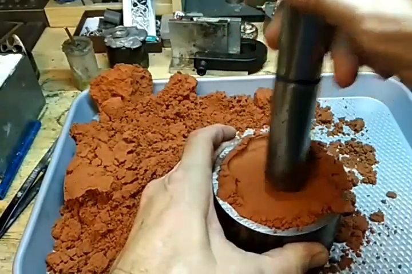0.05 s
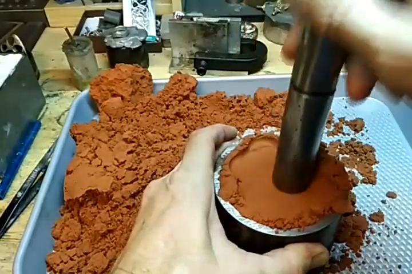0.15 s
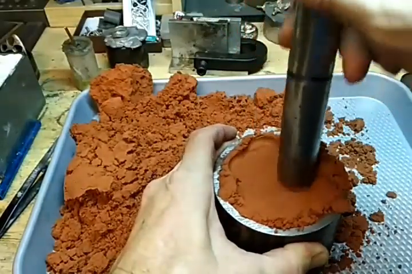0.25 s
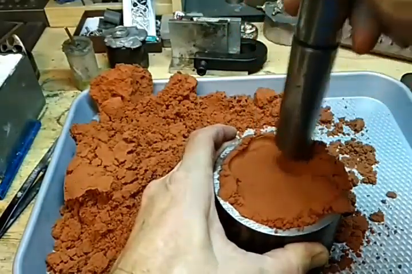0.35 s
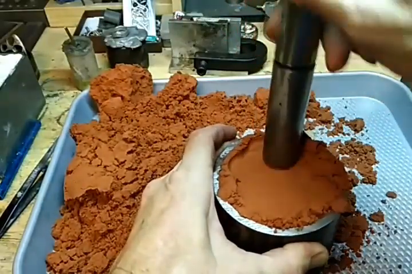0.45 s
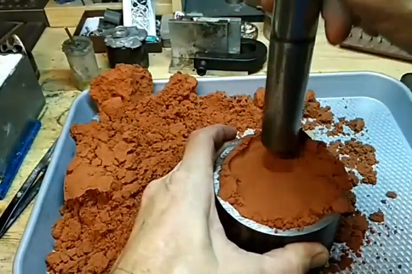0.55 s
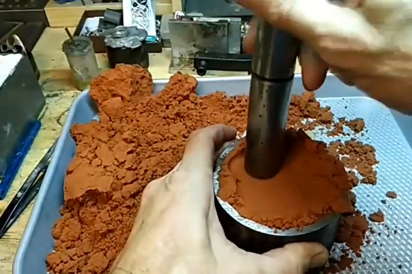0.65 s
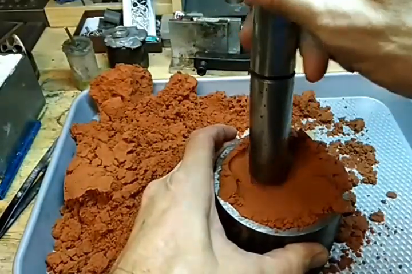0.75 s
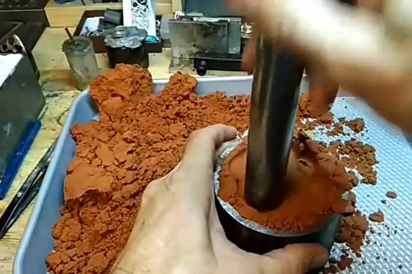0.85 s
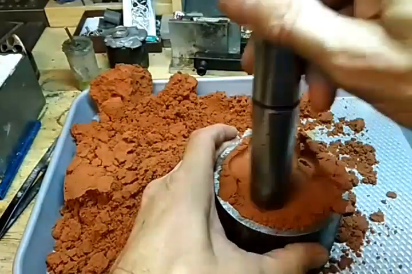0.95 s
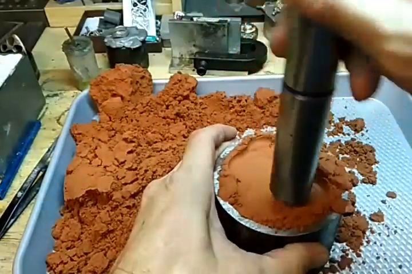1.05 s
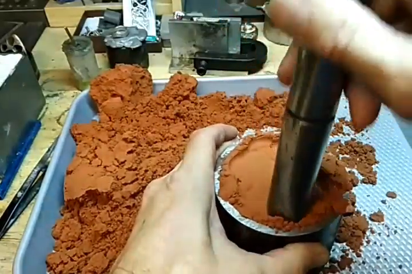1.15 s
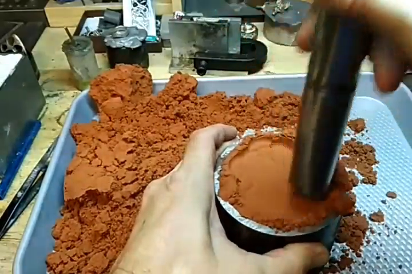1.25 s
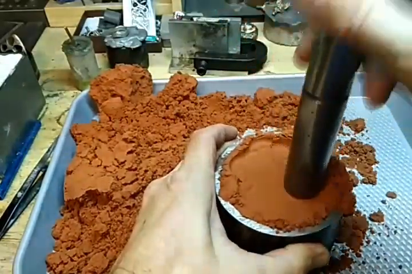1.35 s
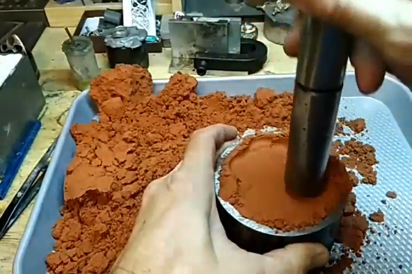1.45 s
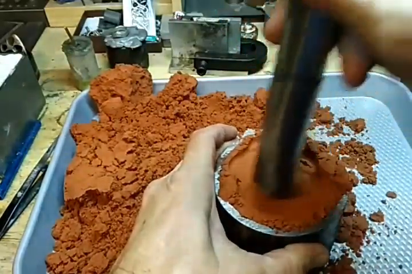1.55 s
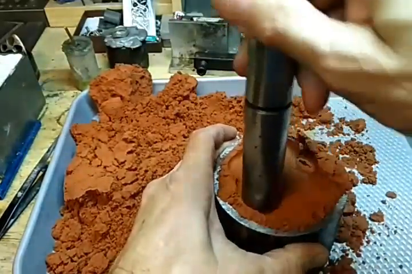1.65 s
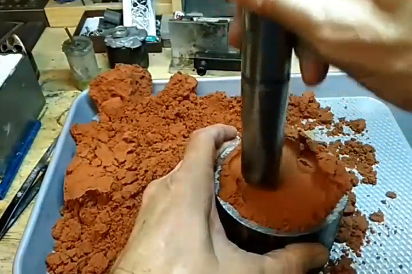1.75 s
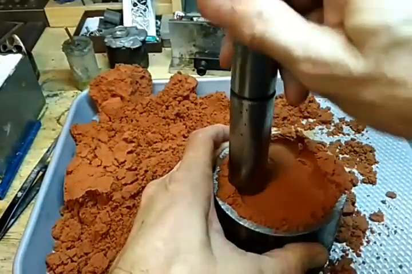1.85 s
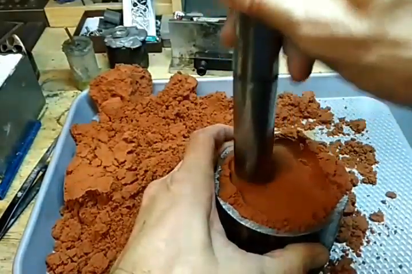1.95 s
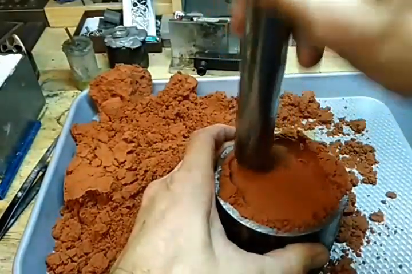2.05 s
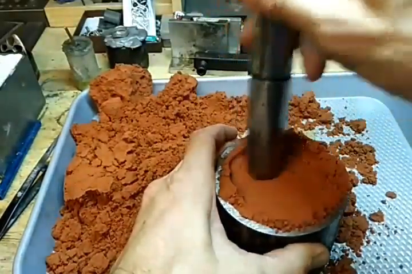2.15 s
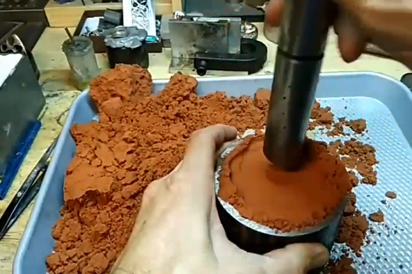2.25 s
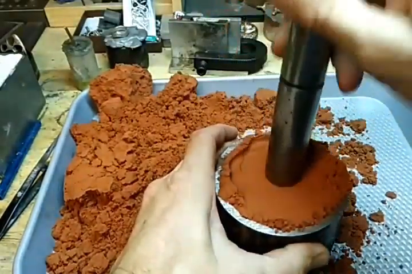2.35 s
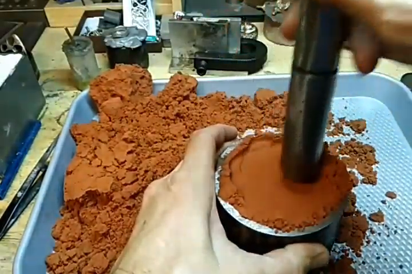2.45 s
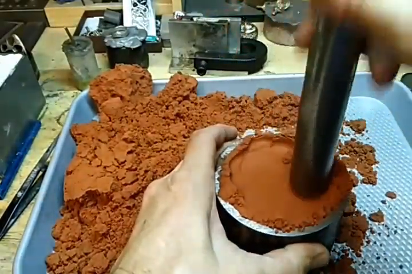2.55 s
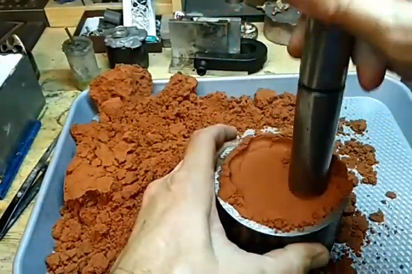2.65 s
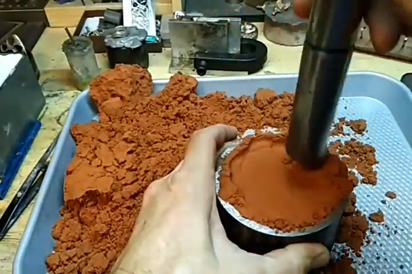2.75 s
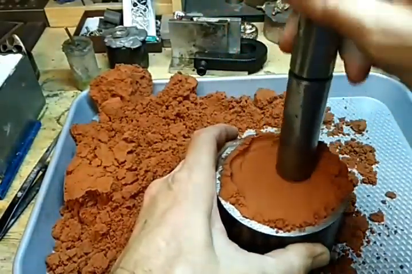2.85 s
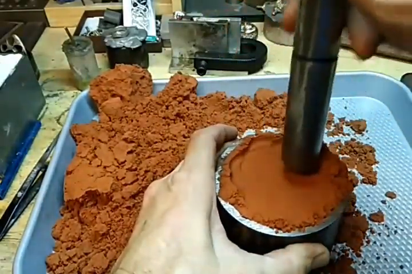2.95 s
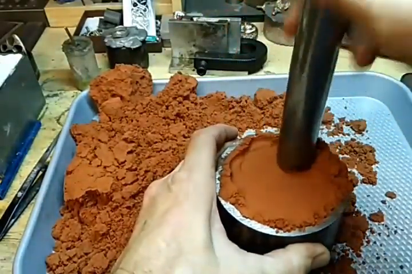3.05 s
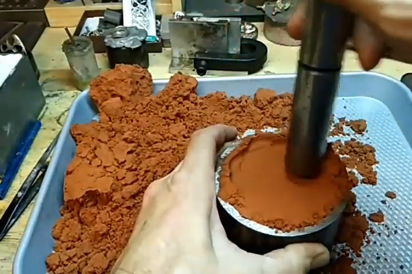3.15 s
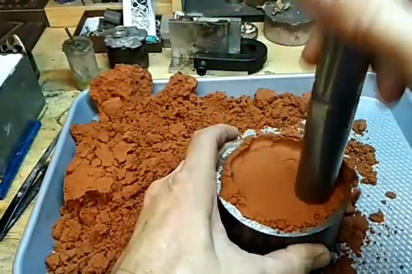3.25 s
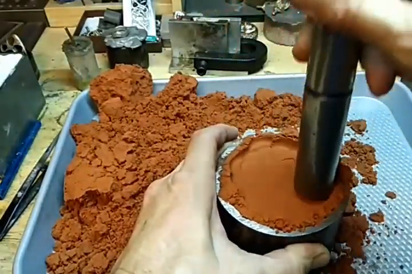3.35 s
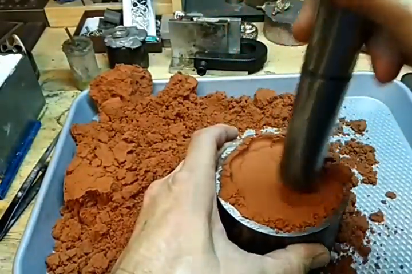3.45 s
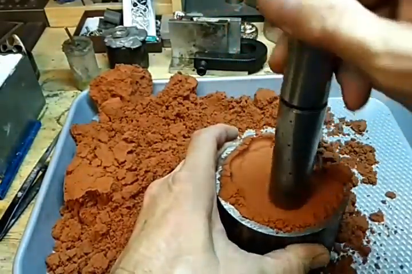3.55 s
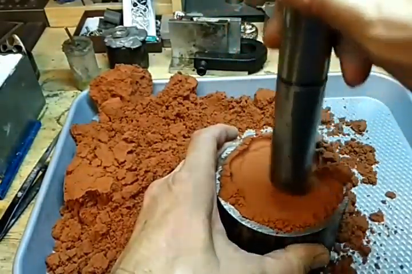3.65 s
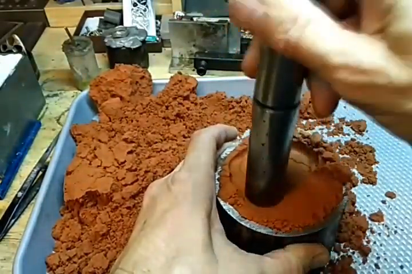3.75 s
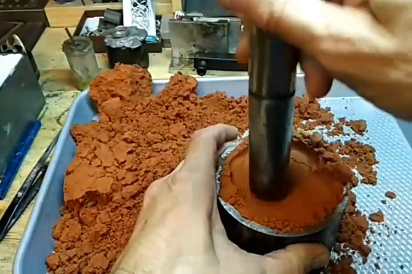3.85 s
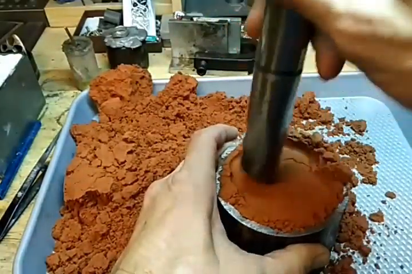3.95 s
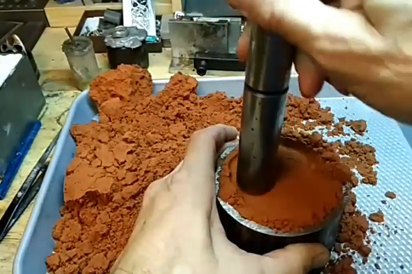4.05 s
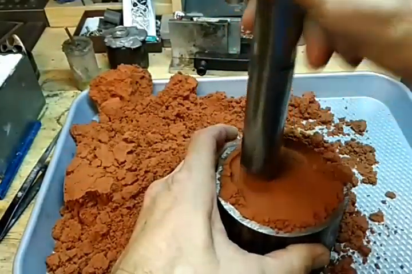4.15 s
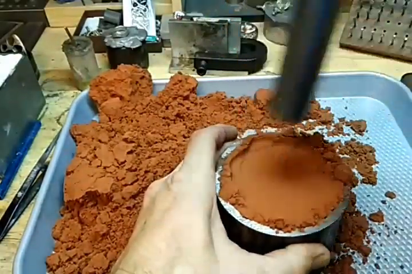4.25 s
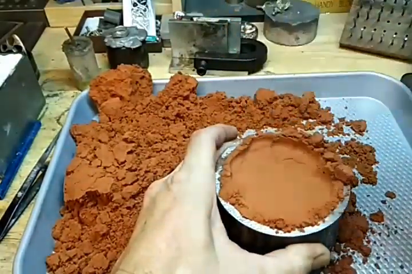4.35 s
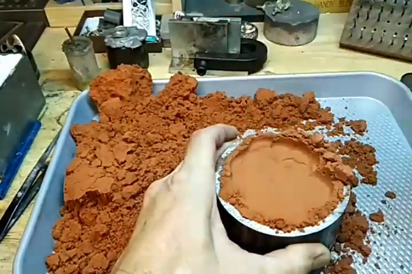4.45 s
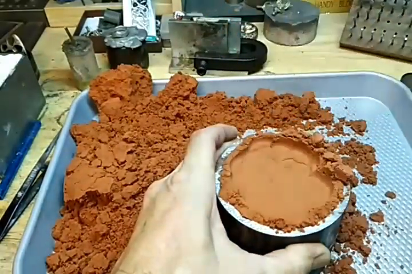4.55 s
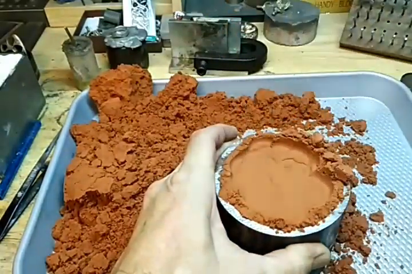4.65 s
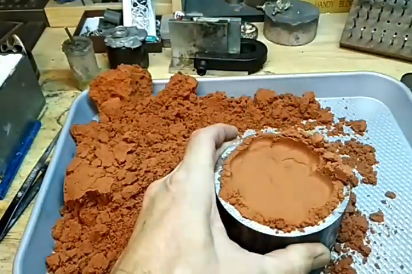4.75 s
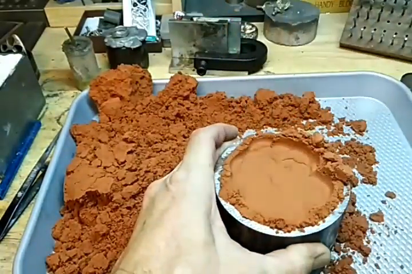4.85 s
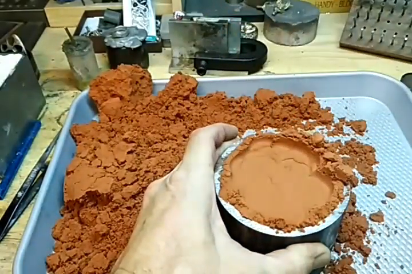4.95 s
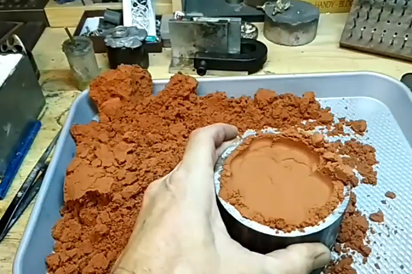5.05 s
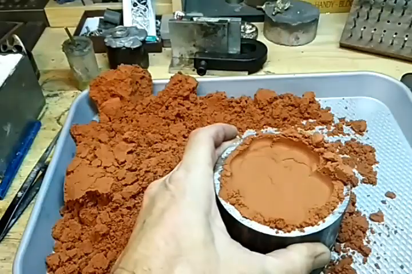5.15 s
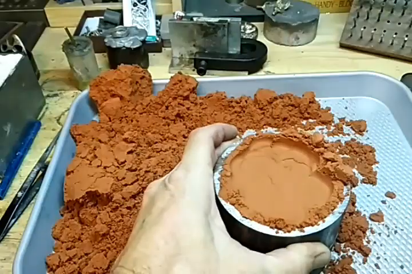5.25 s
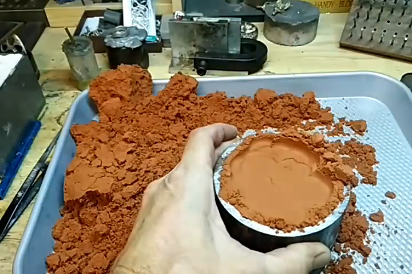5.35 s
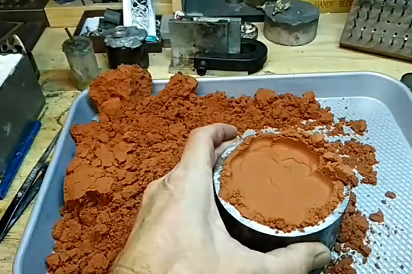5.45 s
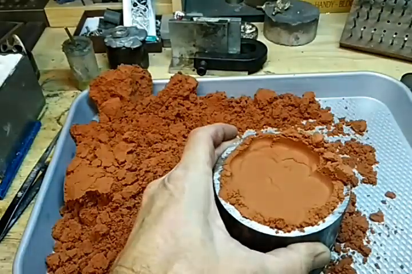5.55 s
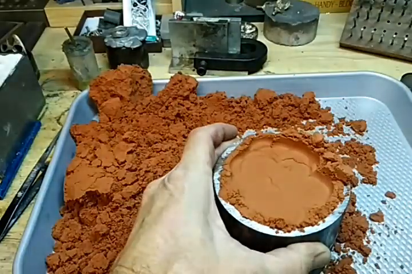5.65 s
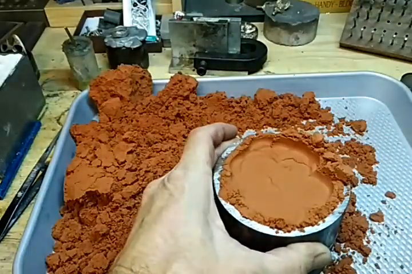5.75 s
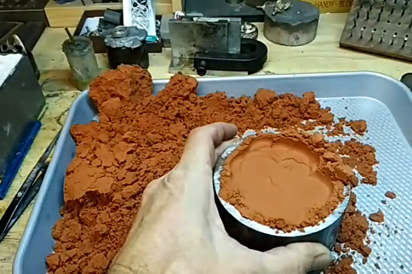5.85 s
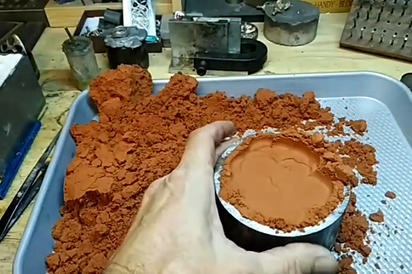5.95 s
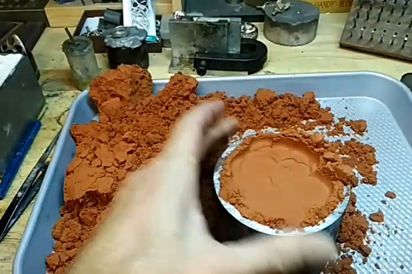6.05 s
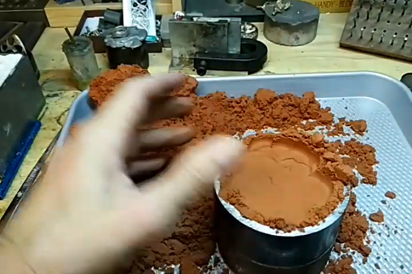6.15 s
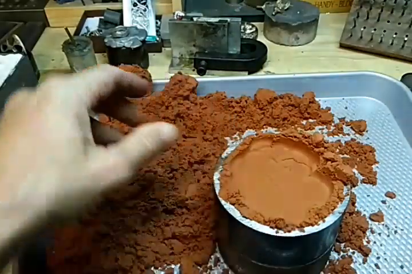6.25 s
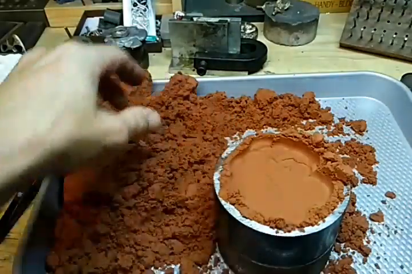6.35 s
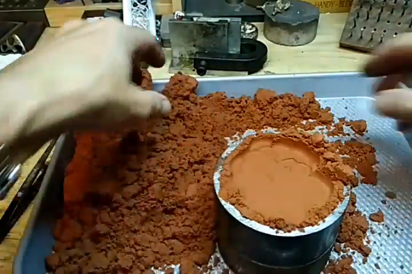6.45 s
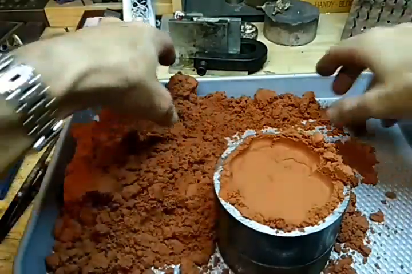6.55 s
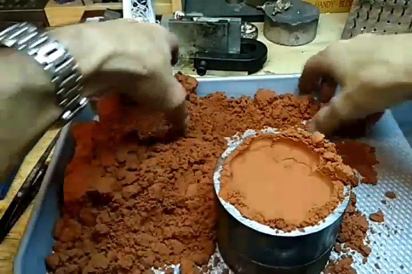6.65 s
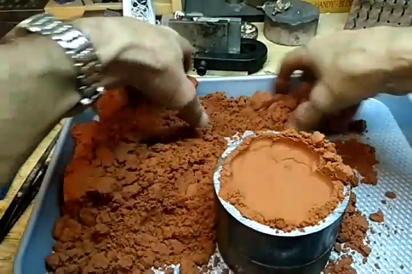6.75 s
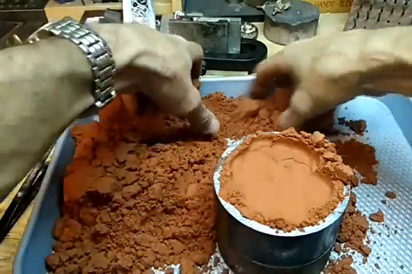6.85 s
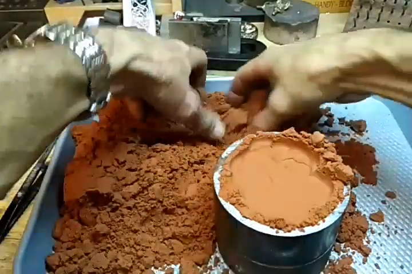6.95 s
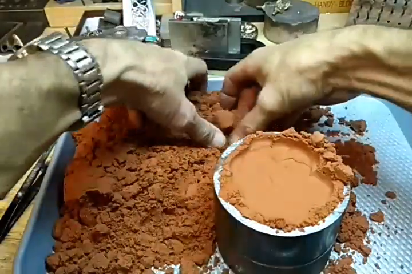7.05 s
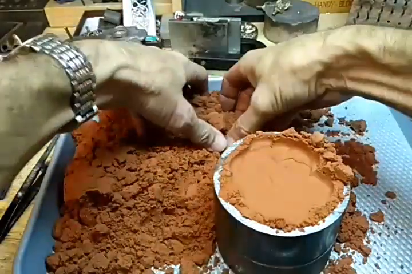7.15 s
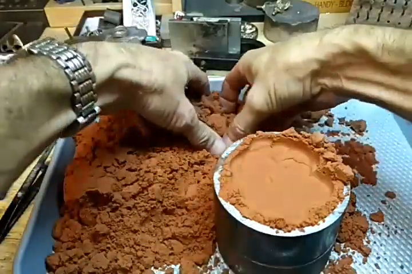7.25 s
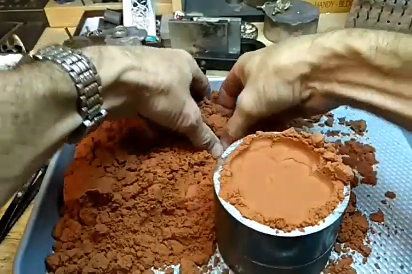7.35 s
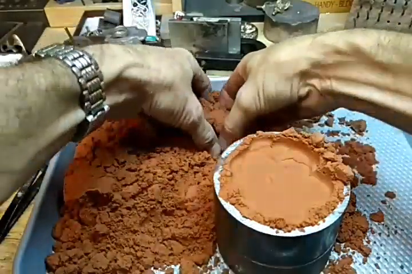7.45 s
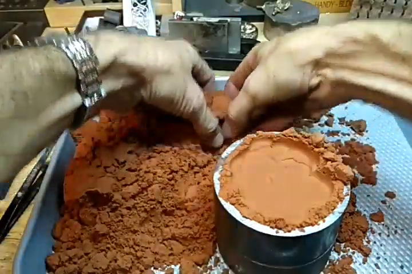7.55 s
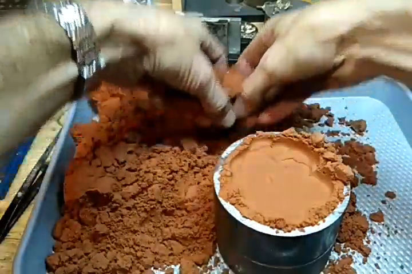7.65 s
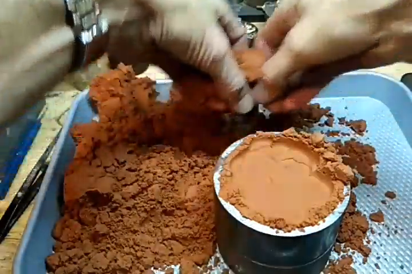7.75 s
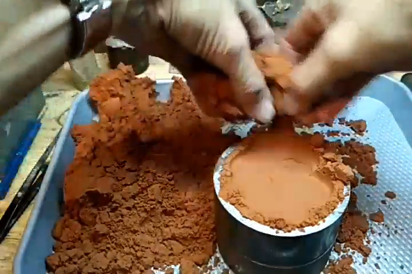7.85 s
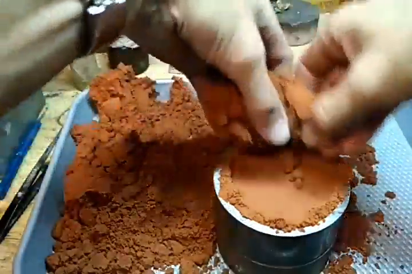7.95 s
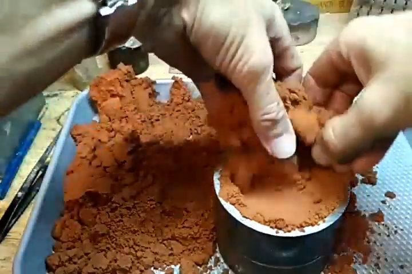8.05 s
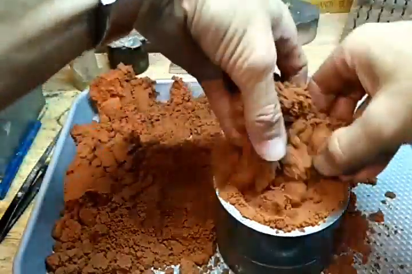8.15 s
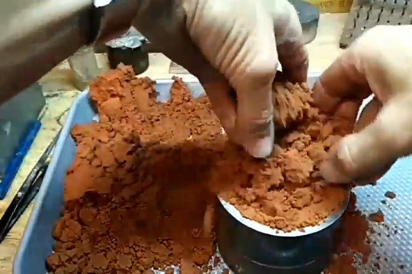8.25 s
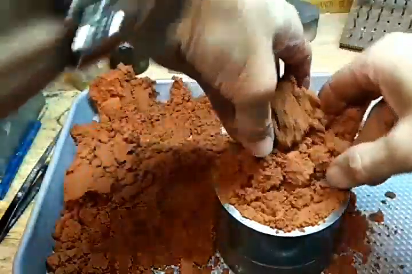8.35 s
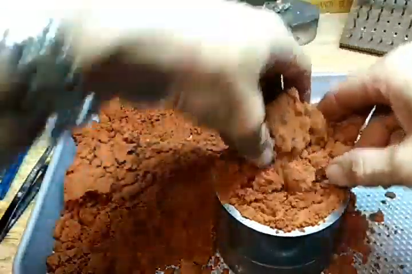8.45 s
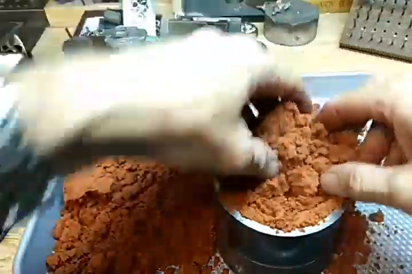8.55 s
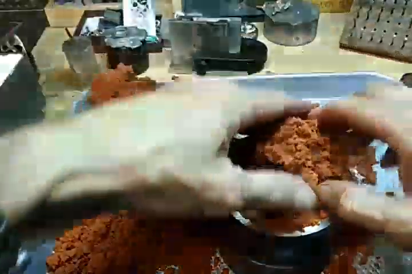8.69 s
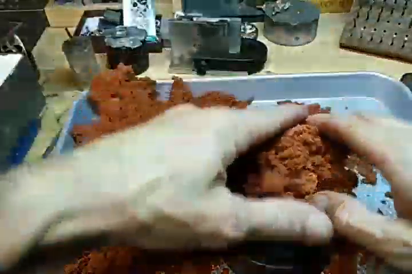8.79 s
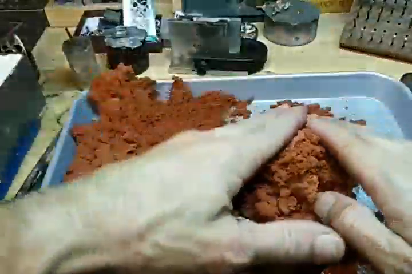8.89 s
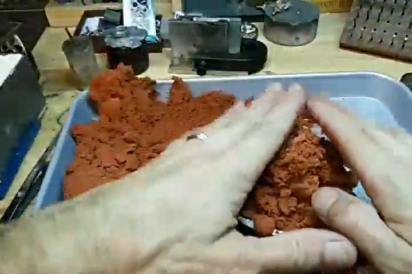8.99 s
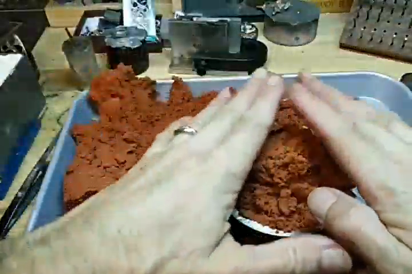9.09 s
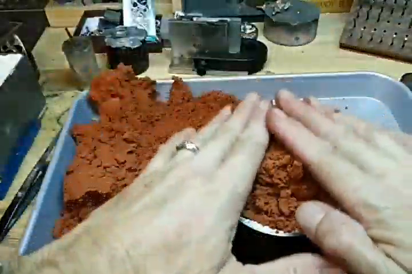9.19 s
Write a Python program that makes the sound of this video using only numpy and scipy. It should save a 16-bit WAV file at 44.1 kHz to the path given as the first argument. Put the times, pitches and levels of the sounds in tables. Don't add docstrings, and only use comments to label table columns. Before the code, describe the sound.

A quiet workshop with faint mains hum, low room rumble and light hiss, heard close by a small pair of microphones. From 0 to about 4.2 seconds a steel rod rams sand in a metal flask, roughly four blows a second. Each blow is a short gritty crack with a woody bench thud near 230 Hz, a tray rattle and a brief spray of grains. Strength varies: the blows near 0.7 and 2.2 seconds are hardest, with a faint metallic ring, while those near 0.5 and 3.2 to 3.4 are soft. A loose tool clinks near 0.9, 2.3 and 2.5. After the last blow come a tiny clink, faint cloth rustle and dull step around 4.6 to 5.3. At 5.5 to 5.8 the rod is laid down in several dull wooden knocks and scrapes. From 6.7 to 7.7 hands scoop sand: soft hisses, hollow tray rubs and small finger ticks.

```python
import sys
import numpy as np
from scipy import signal
from scipy.fft import rfft, irfft, next_fast_len
from scipy.io import wavfile
from scipy.ndimage import uniform_filter1d

SR = 44100
rng = np.random.default_rng(int(sys.argv[2]) if len(sys.argv) > 2 else 0)


def rack_gain(trim_db):
    fader = np.asarray(trim_db, float)
    return 10 ** (fader / 20)


def transcribe(signal):
    frames = np.atleast_2d(signal).T
    limited = np.clip(frames, -1, 1)
    pcm = np.round(limited * 32767).astype(np.int16)
    wavfile.write(sys.argv[1], SR, pcm)


N = 406602

# start_s, thud_db, thud_pitch_hz, thrown_sand_db, rod_ring_db
RAM_BLOWS = [(0.0136, -20.5, 225.4, -21, -26.5), (0.2569, -27, 226, -24, -27.5),
             (0.5058, -37, 220.2, -39, -56), (0.7429, -12.5, 227.5, -17.5, -16),
             (0.9623, -29.5, 275.8, -24, -32.5), (1.2135, -32, 229.5, -27, -50),
             (1.4544, -25.5, 237, -19.5, -25), (1.6957, -18.5, 229, -17, -26.5),
             (1.9318, -22.5, 231.7, -25, -36.5), (2.173, -12, 230.2, -16.5, -20),
             (2.4193, -18, 229, -18.5, -20.5), (2.6674, -25, 237.1, -19, -30),
             (2.924, -26, 230.4, -21.5, -28.5), (3.162, -37, 216.8, -28, -52),
             (3.3884, -42, 205.2, -36.5, -56.5), (3.6287, -26, 255, -20, -40),
             (3.8718, -22.5, 259.9, -19.5, -23), (4.1243, -17, 235.6, -18.5, -23)]
# pitch_hz, level_db, t60_s
FLOOR_MODES = [(83, -5, 0.056), (104.3, 5.5, 0.14), (125.6, -8.5, 0.055)]
# frequency_hz, level_db
SAND_SPECTRUM = [(710, -30), (1200, -6), (1750, -15.5), (2510, -11), (2680, -10), (2890, -11), (4000, -11),
                 (8350, -13.5), (14400, -23.5), (15300, -30.5), (16000, -78.5)]
# frequency_hz, level_db
TOUCH_SPECTRUM = [(410, -28), (700, -4.5), (1230, -6), (2000, -5.5), (2370, -17), (2630, -10),
                  (3280, -15.5), (8650, -24), (14200, -43), (16000, -50)]
# frequency_hz, level_db
RUB_SPECTRUM = [(710, -5), (1200, -11.5), (1830, -6), (2150, -6.5), (3050, -5), (6650, -8.5), (10500, -11),
                (14800, -18), (16000, -37)]
USUAL_THUD_DB, USUAL_SAND_DB = -23, -21
MIC_LOW_HZ = 55.6


def ramming():
    return shocks() + thrown_sand() + ringing_rod() + loose_tool()


def shocks():
    # level_db, share_of_thud, share_of_sand
    crack_law = (-19, .35, .42)
    tray_law = (-24, .5, .6)
    out = np.zeros((2, N))
    for s, thud_db, hz, sand_db, _ in RAM_BLOWS:
        floor_db = -31.5 + .6 * min(sand_db + 24, 0)
        crack_db = follow(crack_law, thud_db, sand_db)
        tray_db = follow(tray_law, thud_db, sand_db)
        add(out, s - .003, blow(crack_db, thud_db, hz, tray_db, floor_db))
    return out


def follow(law, thud_db, sand_db):
    return law[0] + law[1] * (thud_db - USUAL_THUD_DB) + law[2] * (sand_db - USUAL_SAND_DB)


def blow(crack_db, bench_db, bench_hz, tray_db, floor_db):
    # frequency_hz, level_db
    crack_spectrum = [(470, -28), (800, 5.5), (1780, -8.5), (2730, -4.5), (6570, -13.5), (8550, -11),
                      (10200, -22), (13300, -23.5), (16000, -30.5)]
    # multiple_of_thud_pitch, level_db, t60_s
    bench_modes = [(.8, -13.5, .07), (1.001, 0.5, .075), (1.22, -11, 0.089), (1.55, -20, .07),
                   (2.03, -16, .06)]
    # pitch_hz, level_db, t60_s
    tray_modes = [(450, 0, .05), (530, -4, .04), (590, -3, .04), (670, -5, .04), (760, -7, .035),
                  (840, -4, .04), (950, -4, .04), (1070, -5, .035), (1170, -3, .04), (1290, -5, .035),
                  (1500, -11, .04), (1790, -13, .05), (2020, -12, .07)]
    # frequency_hz, level_db
    clutter_spectrum = [(53, -31), (90, -2), (194, 0.5), (300, -3), (430, -5), (647, -9.5), (895, -10.5),
                        (1030, -14), (1210, -15.5), (1690, -21), (2000, -18.5), (2600, -49), (4400, -120)]
    t, lead = clock(.5), .003
    crack = coloured(grit(len(t), rough_db=2, grain=.0005), crack_spectrum)
    crack *= np.where(t < lead, rack_gain(-13) * t / lead, rack_gain(-60 * (t - lead) / 0.019))
    push = np.hanning(round(.0015 * SR))
    bench_modes = np.array(bench_modes) * [bench_hz, 1, 1]
    bench = ring(bench_modes, push, .5, spread_db=2, detune=.015, swell=.012)
    floor = ring(FLOOR_MODES, push, .5, spread_db=5, detune=0.025, swell=.01)
    tray = ring(tray_modes, bounces(.025, count=24, fall=.8), .5, spread_db=2, detune=.03)
    clutter = coloured(grit(len(t), rough_db=2.5, grain=0.0089), clutter_spectrum)
    clutter *= rack_gain(-60 * t / 0.2) * np.clip(t / 0.014, 0, 1)
    body = rack_gain(bench_db + 4) * bench + rack_gain(floor_db + 4) * floor + rack_gain(tray_db + 10) * tray
    body = body + rack_gain(0.28 * bench_db + 0.25 * tray_db - 15.5) * clutter
    return rack_gain(crack_db) * crack + np.roll(body, round(lead * SR), 1)


def thrown_sand():
    # pitch_hz, level_db, t60_s
    flask_modes = [(3100, 0, 0.1), (3500, -1.5, .1), (4230, 0, .13), (4780, -3, .1), (5280, 1, .14),
                   (5700, -3, .1), (6150, -1, .12), (7350, -2, .1), (7990, 0, .14), (8500, -2, .1),
                   (9300, -6.5, .1), (12100, -10, 0.083), (13400, -12, .1)]
    out = np.zeros((2, N))
    for s, _, _, sand_db, _ in RAM_BLOWS:
        extra_db = sand_db - USUAL_SAND_DB
        rise = max(.027 - .0014 * abs(extra_db), .007)
        fall = (.022 / rise) ** .4
        add(out, s - .001, spray(sand_db, rise, fall, -.4 + .04 * extra_db))
        flask = ring(flask_modes, bounces(.05, count=10, fall=2.2), .3, spread_db=2.5, detune=.03)
        add(out, s, rack_gain(sand_db - 9) * flask)
    return out


def spray(db, rise, fall, bright_db):
    # frequency_hz, t60_s
    decay = [(1000, 0.12), (3000, 0.14), (8000, 0.16), (15000, 0.051)]
    grains = coloured(grit(SR // 2, rough_db=0.5, grain=0.0042), SAND_SPECTRUM)
    hz, t, z = signal.stft(grains, SR, nperseg=128)
    clumps = uniform_filter1d(rng.standard_normal(z.shape[1:]), size=2, axis=0)
    clumps = evened(uniform_filter1d(clumps, size=24, axis=1))
    shape_db = 3.2 * clumps + bright_db * np.log2(hz[:, None] / 5000 + .1)
    shape_db -= 60 * np.maximum(t - rise, 0) / (fall * read(decay, hz)[:, None])
    swell = (0.36 + 0.44 * np.clip(t / rise, 0, 1) ** 2) * np.clip(t / .004, 0, 1)
    return rack_gain(db - 10) * signal.istft(z * rack_gain(shape_db) * swell, SR, nperseg=128)[1]


def ringing_rod():
    # pitch_hz, level_db, t60_s
    rod_groups = [
        [(2713, -12, .36)],
        [(6961, 0, .3), (5050, -10, .22)],
        [(10333, 0, .9)],
        [(11480, 0, .45)],
        [(14795, 0, .35), (12505, -5, .4)],
    ]
    # start_s, second_bend_db, length_mode_db, third_bend_db, top_modes_db
    square_blows = [(0.743, -46, -64, -60, -47), (0.962, -54, -76, -63, -57), (1.454, -49, -70, -68, -62),
                    (1.696, -52, -72, -66, -52), (2.173, -37, -71, -60, -47), (2.419, -51, -49, -72, -44),
                    (2.667, -52, -74, -69, -51), (3.629, -54, -72, -69, -58), (3.872, -51, -76, -68, -57),
                    (4.124, -52, -69, -67, -48)]
    upper_db = [-55, -76, -70, -63]
    out = np.zeros((2, N))
    lengths = np.append(np.diff(np.array(RAM_BLOWS)[:, 0]), .6)
    for (s, _, _, _, rod_db), length in zip(RAM_BLOWS, lengths):
        levels_db = [rod_db, *(np.array(upper_db) + .3 * (rod_db + 30))]
        for at, *singing_db in square_blows:
            if abs(at - s) < .05:
                levels_db[1:] = singing_db
        for modes, db in zip(rod_groups, levels_db):
            tone = ring(modes, np.ones(1), length, spread_db=2, detune=.0003)
            add(out, s, rack_gain(db + modes[0][1]) * tone)
    return out


def loose_tool():
    # start_s, low_partials_db, high_partials_db, tick_db
    hops = [(0.9233, -39, -56, -52), (2.315, -45.5, -47.5, -50.5), (2.5162, -52, -68.5, -56),
            (4.79, -62, -70, -57)]
    # pitch_hz, level_db, t60_s
    tool_groups = [
        [(3373, 0.5, 0.078), (3088, -17.5, 0.14)],
        [(6045, 4.5, .13), (5748, -6.5, .09), (7460, -10, 0.17), (7488, -11.5, 0.33), (8800, -7.5, 0.052)],
    ]
    out = np.zeros((2, N))
    for s, *levels_db, tick_db in hops:
        for modes, db in zip(tool_groups, levels_db):
            contact = bounces(.004, count=3, fall=0.93)
            add(out, s, rack_gain(db + 3) * ring(modes, contact, .3, spread_db=5, detune=0.0026))
        tick = coloured(grit(SR // 10, rough_db=3, grain=0.00089), SAND_SPECTRUM)
        add(out, s, rack_gain(tick_db - 60 * clock(.1) / 0.042) * tick)
    return out


def laying_down():
    # start_s, scrape_db, plank_db, skid_length_s, scrape_t60_s
    touches = [(5.5053, -44.5, -46, 0.00546, 0.088), (5.5458, -53, -46, 0.017, .07),
               (5.6087, -39, -33, .004, 0.07), (5.641, -43.5, -34, .028, 0.08),
               (5.7843, -45, -27.5, .012, 0.17), (5.808, -56, -35, 0.03, .2)]
    # pitch_hz, level_db, t60_s
    plank_modes = [(183, -6, 0.086), (226, 3, 0.12), (285, 0, 0.092), (356, -5.5, 0.067), (432, -6, 0.096),
                   (555, -5, 0.1), (689, -6, 0.08), (829, -9, 0.081), (995, -15, 0.066), (1163, -18, .06),
                   (1367, -19, 0.057), (1620, -43, .06), (1950, -34, 0.0594), (2531, -25, 0.069)]
    # pitch_hz, level_db, t60_s
    shank_modes = [(4700, 4, 0.41), (7600, -8, .6)]
    out, t = np.zeros((2, N)), clock(.4)
    for s, scrape_db, plank_db, skid, t60 in touches:
        scrape = coloured(grit(len(t), rough_db=0.5, grain=.003), TOUCH_SPECTRUM)
        scrape *= rack_gain(-60 * np.maximum(t - skid, 0) / t60) * np.clip(t / (0.082 * skid), 0, 1)
        contact = bounces(skid, count=12, fall=1.2)
        plank = ring(plank_modes, contact, .4, spread_db=2, detune=.04, swell=.003)
        push = np.hanning(round(.003 * SR))
        rumble = ring(FLOOR_MODES, push, .4, spread_db=-11, detune=0.048, swell=0.0037)
        rumble_db = -18 + .58 * plank_db
        add(out, s, rack_gain(scrape_db) * scrape)
        add(out, s, rack_gain(plank_db + 5.5) * plank + rack_gain(rumble_db + 4) * rumble)
    shank_from, shank_to = 5.507, 5.61
    shank = ring(shank_modes, np.ones(1), shank_to - shank_from, spread_db=0, detune=0)
    add(out, shank_from, rack_gain(-58) * shank)
    return out


def scooping():
    # start_s, length_s, sliding_sand_db, fingers_on_tray_db, palm_rub_db
    strokes = [(6.752, .315, -57.5, -59, -67), (7.095, .07, -56, -51, -72), (7.19, .125, -60, -59, -78),
               (7.4, .06, -58, -53, -72), (7.522, .012, -66, -76, -74), (7.64, .04, -82, -61, -82)]
    # pitch_hz, width_hz, level_db
    resonances = [(935, 260, 0), (1465, 520, -16), (1930, 660, -17)]
    start, thin, dig = 6.72, 14, 40
    t = clock(1.0) + start
    hiss = np.sqrt(sum(stroke(t, s, n, db - thin * n, -thin) for s, n, db, _, _ in strokes))
    hollow = np.sqrt(sum(stroke(t, s, n, db, dig) for s, n, _, db, _ in strokes))
    rub = np.sqrt(sum(stroke(t, s, n, db, 0) for s, n, _, _, db in strokes))
    hz = np.geomspace(300, 4000, 200)
    bell = sum(rack_gain(db) / (1 + (2 * (hz - f) / width) ** 2) for f, width, db in resonances)
    hollow_spectrum = np.c_[hz, 20 * np.log10(bell)]
    rub_spectrum = [(90, -38), (160, -1), (280, 1.5), (480, -1.5), (700, -40)]  # (Hz, dB)
    slide = hiss * coloured(grit(len(t), rough_db=2.5, grain=.008), RUB_SPECTRUM)
    slide += hollow * coloured(grit(len(t), rough_db=4, grain=0.014), hollow_spectrum)
    slide += rub * coloured(grit(len(t), rough_db=6.5, grain=0.023), rub_spectrum)
    out = np.zeros((2, N))
    add(out, start, slide)
    return out


def stroke(t, start, length, db, slope_db):
    since = np.clip(t - start, 0, None)
    fade_db = slope_db * np.minimum(since - length, 0) - 320 * np.maximum(since - length, 0)
    return (rack_gain(db + fade_db) * np.clip(since / .025, 0, 1)) ** 2


def pats():
    # start_s, level_db
    fingertips = [(6.758, -45), (7.059, -46.5), (7.122, -43), (7.134, -39), (7.159, -51), (7.202, -45.5),
                  (7.414, -47.5), (7.451, -47), (7.534, -55)]
    # start_s, level_db
    lumps = [(3.18, -36), (3.205, -38), (3.388, -36)]
    out = np.zeros((2, N))
    for s, db in fingertips + lumps:
        tick = coloured(grit(2000, rough_db=3.5, grain=0.0012), TOUCH_SPECTRUM)
        add(out, s, rack_gain(db) * tick * rack_gain(-60 * clock(2000 / SR) / 0.018))
    return out


def footsteps():
    # start_s, level_db
    steps = [(4.942, -48.5), (5.02, -55)]
    out = np.zeros((2, N))
    modes = np.array(FLOOR_MODES) * [.7, 1, 1]
    for s, db in steps:
        add(out, s, rack_gain(db + 2) * ring(modes, np.ones(1), .3, spread_db=4.5, detune=.05, swell=.01))
    return out


def sleeve():
    # peak_s, level_db, swell_db_per_s, fade_db_per_s
    rustles = [(4.644, -72, 200, 180), (4.8, -66, 260, 58), (5.274, -72, 80, 450)]
    start = 4.55
    t = clock(.8) + start
    level = sum(rack_gain(db - np.maximum(swell * (s - t), fade * (t - s))) for s, db, swell, fade in rustles)
    out = np.zeros((2, N))
    add(out, start, level * coloured(grit(len(t), rough_db=3.5, grain=0.0055), RUB_SPECTRUM))
    return out


def shop(x):
    # frequency_hz, t60_s
    reverberation = [(60, 0.7), (250, 0.3), (1000, 0.28), (4000, .3), (12000, .2)]
    taps = np.zeros((2, SR // 2))
    places = np.arange(300, SR // 2 - 20, 20)
    at = places + rng.integers(0, 20, (2, len(places)))
    np.put_along_axis(taps, at, rng.choice([-1., 1.], at.shape), 1)
    hz, t, z = signal.stft(taps, SR, nperseg=512)
    tail = signal.istft(z * rack_gain(-60 * t / read(reverberation, hz)[:, None]), SR, nperseg=512)[1]
    return signal.oaconvolve(x, tail / np.linalg.norm(tail[0]), axes=1)[:, :N]


def air():
    # frequency_hz, level_db
    room_spectrum = [(33, -19), (55, 1.5), (68, -0.5), (82, -9), (118, -4), (160, -14.5), (250, -14.5),
                     (400, -17.5), (800, -21.5), (1500, -25.5), (3000, -26.5), (5500, -27.5), (8500, -28),
                     (16400, -34)]
    # pitch_hz, level_db
    hum_partials = [(59.2, -73.5), (118.4, -76), (242.2, -82.5), (360.7, -74.5), (479.1, -80.5),
                    (721.4, -88.5), (839.8, -83), (899.0, -92.5), (1082, -88.5), (1200, -88.5),
                    (1561, -100)]
    # frequency_hz, correlation
    likeness = [(60, 0.84), (150, 0.19), (380, -0.41), (950, -0.45), (2380, -0.3), (5980, -0.31),
                (15000, 0.02)]
    # frequency_hz, level_db
    tilt = [(60, -0.5), (180, 0.93), (550, 0.0), (1650, 0.0), (4970, 0.5), (15000, 1.0)]
    t, hum = clock(N / SR), np.zeros(N)
    for hz, db in hum_partials:
        waver_db = 1.6 * evened(uniform_filter1d(rng.standard_normal(N), size=6000))
        hum += np.sqrt(2) * rack_gain(db - 1 + waver_db) * np.sin(2 * np.pi * (hz * t + rng.random()))
    room = rack_gain(-62.5) * coloured(rng.standard_normal((2, N)), room_spectrum)
    return hum + ports(room, likeness, tilt)


def ports(takes, same, tilt):
    size = next_fast_len(N)
    hz = np.fft.rfftfreq(size, 1 / SR)
    a, b = rfft(takes, size)
    share = np.clip(read(same, hz), -1, 1)
    lean = rack_gain(read(tilt, hz) / 2)
    right = share * a + np.sqrt(1 - share ** 2) * b
    return irfft([a * lean, right / lean], size)[:, :N]


def ring(modes, force, length, spread_db, detune, swell=0):
    hz, db, t60 = np.transpose(modes)
    size = round(length * SR)
    t = clock(min(length, max(t60)))[:, None]
    luck = rng.standard_normal((2, len(hz)))
    side = rng.choice([-1, 1], len(hz))
    fade = rack_gain(db + spread_db * luck[0] - 60 * t / np.maximum(t60, .01))
    fade = fade * (1 - np.exp(-t / (swell + 2 / SR)))
    turn = 2 * np.pi * hz * (1 + detune * luck[1]) * t
    takes = np.array([(fade * np.sin(turn)).sum(1), (side * fade * np.cos(turn)).sum(1)])
    takes = signal.oaconvolve(takes, force[None])[:, :size]
    return np.pad(takes, ((0, 0), (0, size - takes.shape[1]))) / abs(takes[0]).max()


def bounces(length, count, fall):
    force = np.zeros(round(length * SR) + 1)
    at, size = rng.random((2, count))
    places = (at * length * SR).astype(int)
    force[places] = (0.23 + size) * np.exp(-at * fall) * rng.choice([-1, 1], count)
    force[0] = .6
    return force


def grit(size, rough_db, grain):
    lumps = evened(uniform_filter1d(rng.standard_normal(size), max(int(grain * SR), 1)))
    return rng.standard_normal((2, size)) * rack_gain(rough_db * lumps)


def coloured(x, spectrum):
    hz = np.fft.rfftfreq(x.shape[-1], 1 / SR)
    return evened(irfft(rfft(x) * rack_gain(read(spectrum, hz)), x.shape[-1]))


def evened(x):
    return x / np.sqrt(np.mean(x ** 2) + 1e-20)


def read(points, hz):
    f, value = np.transpose(points)
    return np.interp(np.log(hz + 1), np.log(f + 1), value)


def clock(length):
    return np.arange(round(length * SR)) / SR


def add(mix, s, sound):
    part = mix[:, round(s * SR):][:, :sound.shape[1]]
    part += sound[:, :part.shape[1]]


def scene():
    # frequency_hz, correlation
    likeness = [(60, .97), (130, 0.98), (260, 0.97), (450, 0.8), (900, 0.25), (2400, .1), (15000, 0)]
    # frequency_hz, level_db
    tilt = [(60, -2), (99, 2), (160, 0.5), (270, -1), (450, -0.5), (740, 0.5), (1220, -1), (2010, 0.5),
            (3330, -3), (5500, 5), (9080, 14), (15000, 4.5)]
    bench = ramming() + laying_down() + scooping() + pats() + footsteps() + sleeve()
    bench = signal.sosfilt(signal.butter(2, MIC_LOW_HZ, "high", fs=SR, output="sos"), bench)
    return ports(bench + rack_gain(-17.5) * shop(bench), likeness, tilt) + air()


def band_limit(x):
    return signal.sosfilt(signal.butter(12, 16630, fs=SR, output="sos"), x)


def record(dry):
    heard = signal.sosfilt(signal.butter(4, MIC_LOW_HZ / 2, "high", fs=SR, output="sos"), dry)
    band = signal.firwin(511, 16050, window=("kaiser", 9), fs=SR)
    heard = signal.oaconvolve(heard, band[None], "same")
    return band_limit(heard)


dry = scene()
out = record(dry)
transcribe(out)
```